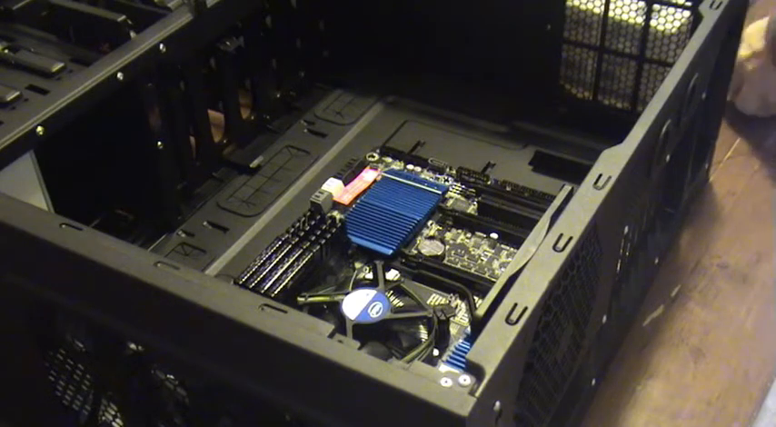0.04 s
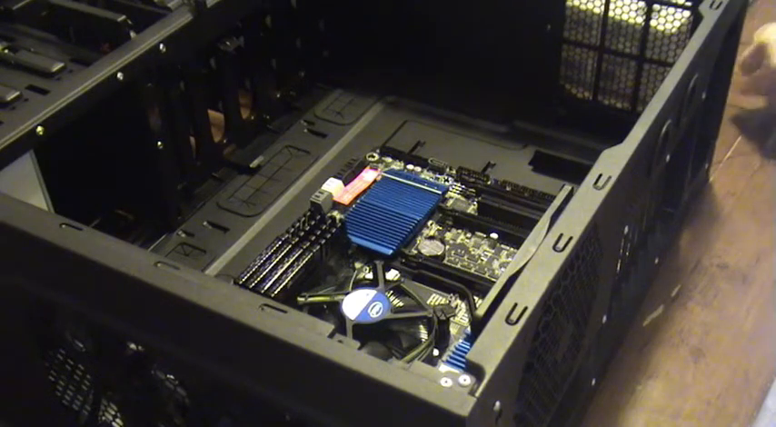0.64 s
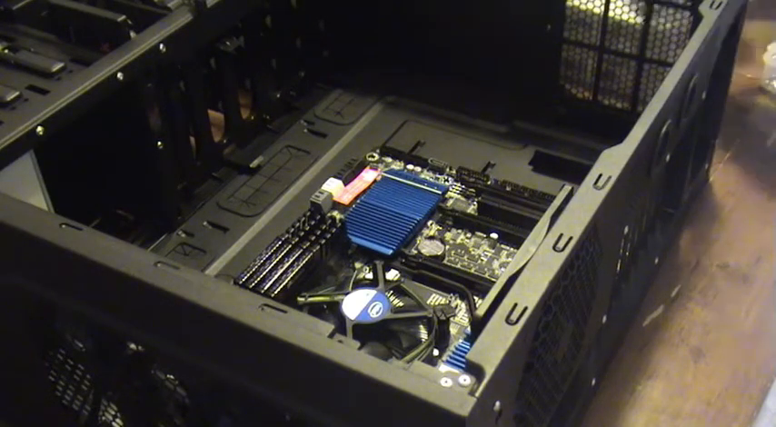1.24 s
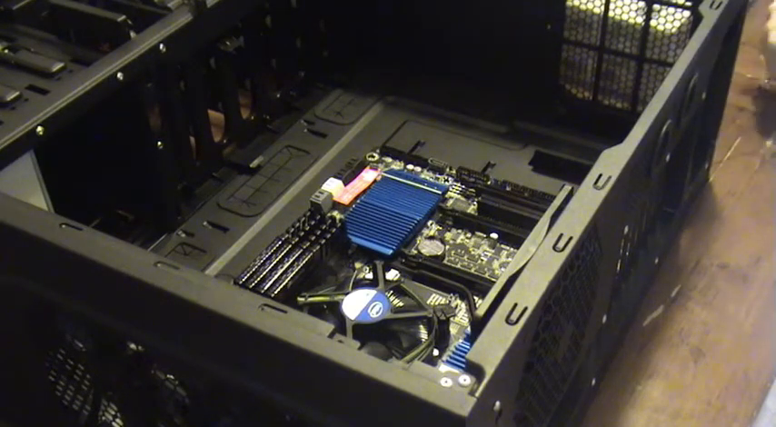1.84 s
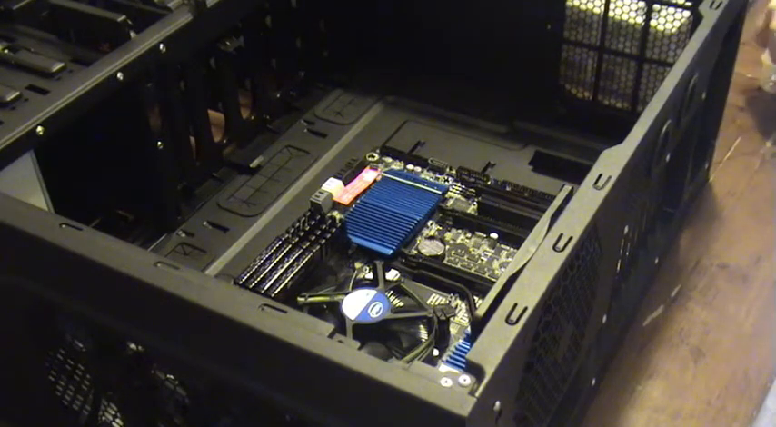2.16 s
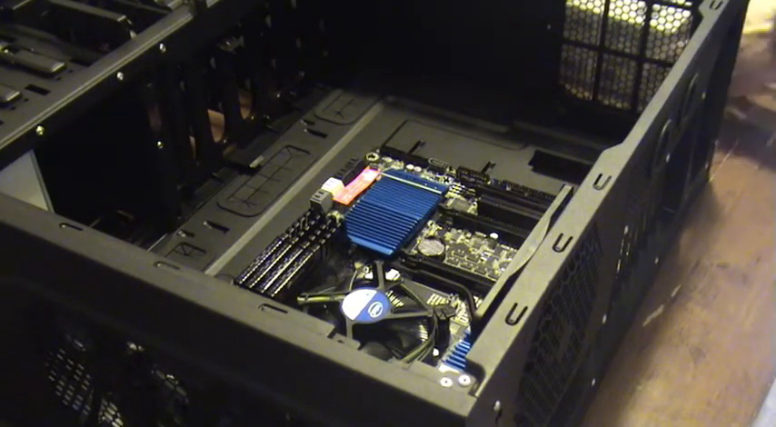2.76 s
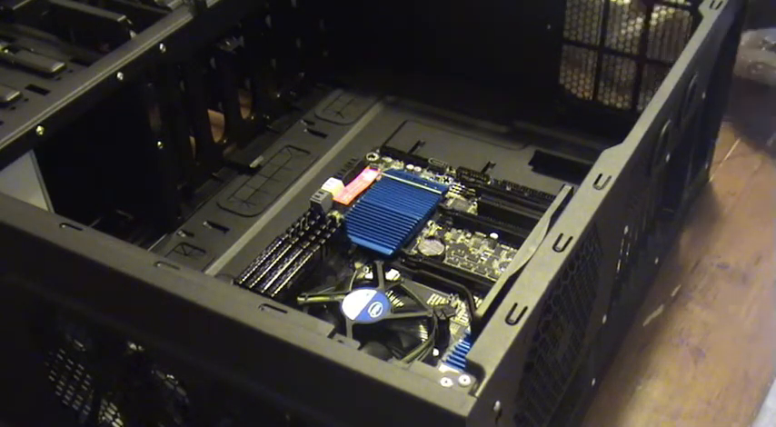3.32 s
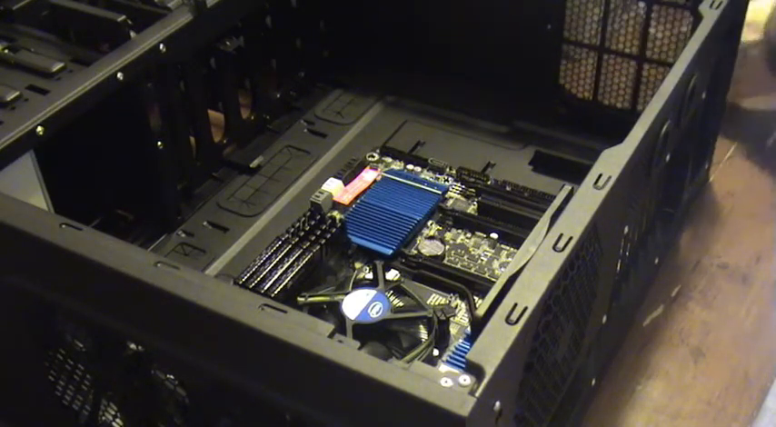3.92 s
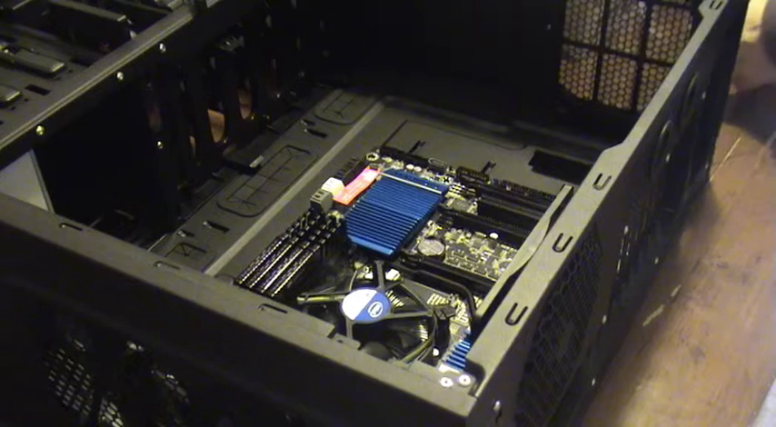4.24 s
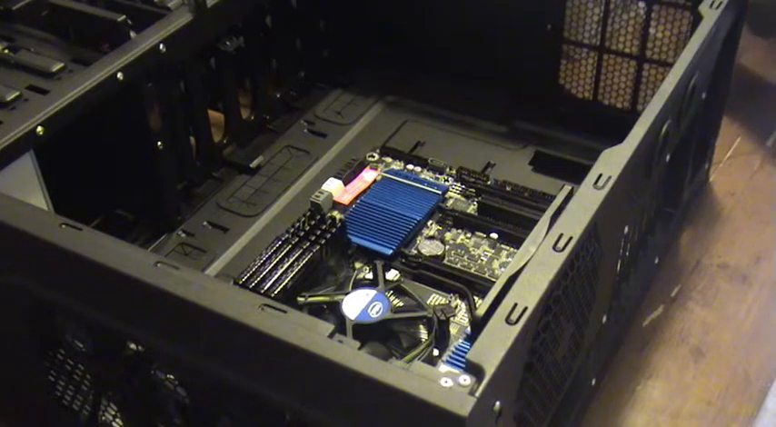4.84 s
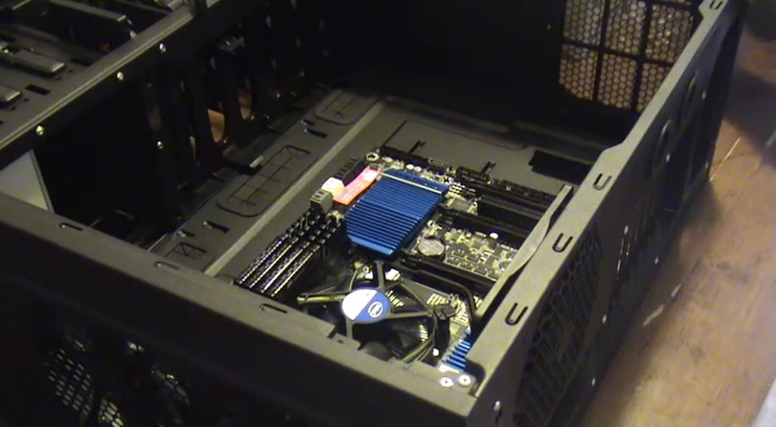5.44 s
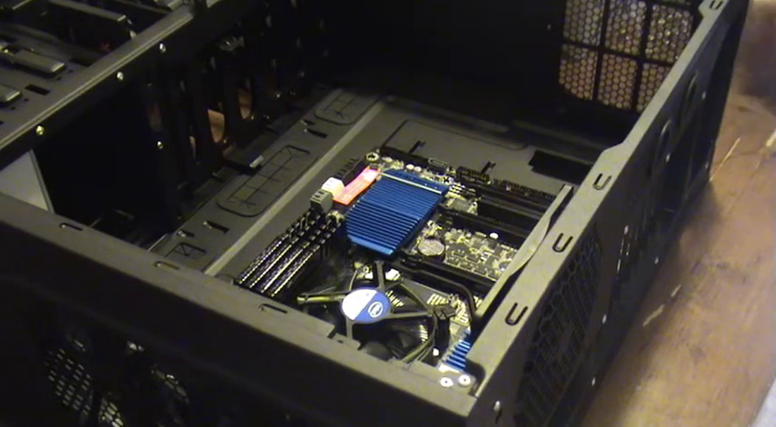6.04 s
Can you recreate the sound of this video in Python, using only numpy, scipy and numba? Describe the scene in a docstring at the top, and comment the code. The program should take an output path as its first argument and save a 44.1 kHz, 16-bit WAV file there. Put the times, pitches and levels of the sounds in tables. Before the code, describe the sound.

A hand rummages through small screws in a hollow box on a wooden bench, over the faint hush of a bare room. From the start, short pushes rattle the screws and the box, with sharp single clinks. The box is knocked or set down at about 0.3, 1 and 1.4 seconds, and another burst of bright clinks comes around 2 seconds, with dull bumps under the sharpest. After a brief lull, a sleeve rustles softly near 3 seconds, along with light clinks and small knocks. The longest rummage runs from about 3.7 to 5.5 seconds, a dense metallic rattle with a hollow ring from the box and many sharp clicks. One more clink follows at 5.5 seconds and a last light knock near 6 seconds. The room rings briefly after each burst.

```python
"""A hand rummages through small screws in a box on a wooden bench, over the faint hush of a bare room.
From the start, each push rattles the screws, the hollow box and the bench top, and single screws clink.
The box is knocked and set down in the first two seconds, and dull bumps sit under some sharp clinks.
Near three seconds a sleeve rustles; then comes the longest rummage, and a last knock near six seconds.
The room rings on after each burst, and a limiter holds down the sharpest peaks."""
import sys
import numpy as np
from scipy import signal
from scipy.fft import rfft, irfft
from scipy.io import wavfile
from scipy.ndimage import uniform_filter1d, minimum_filter1d
from numba import njit

SR = 44100
rng = np.random.default_rng(int(sys.argv[2]) if len(sys.argv) > 2 else 0)


def put_to_file(sound):
    """Save the sound as 16-bit audio at rate SR, in the file named by the first command-line argument."""
    columns = np.atleast_2d(sound).T  # one column per channel
    safe = np.clip(columns, -1, 1)
    whole_steps = np.round(safe * 32767)
    wavfile.write(sys.argv[1], SR, whole_steps.astype(np.int16))


N = 268128
TIME = np.arange(N) / SR

# Levels in the tables are relative: the functions add their own gains.
# Pushes of the hand. Each row: time of full speed, then attack, hold and release, all in seconds; levels
# of screws, box, bench and thud in dB; hollow share of the box sound (0 to 1); hollow pitch in Hz.
PUSHES = [ (0.002, 0.015, 0.0025, 0.041, -24.5, -35, -33.5, -36.5, 0.04, 1410),
          (0.066, 0.028, 0.099, 0.17, -23, -37.5, -38, -45.5, 0, 1410),
          (0.341, 0.014, 0.052, 0.25, -18, -15, -19, -28, 0, 1240),
          (0.404, 0.013, 0.078, .22, -22, -21.5, -28.5, -38, 0.16, 1220),
          (0.671, .015, 0.0046, 0.044, -26.5, -30, -28.5, -41, 0, 1260),
          (0.886, .02, 0.038, .04, -42, -56, -46.5, -61, 0.03, 1240),
          (0.982, 0.027, 0.0062, 0.16, -20, -23.5, -30.5, -39.5, 0.66, 1330),
          (1.889, 0.014, 0.063, .11, -17, -22, -40, -42.5, 0.93, 1470),
          (2.061, 0.0068, 0.0067, 0.21, -24, -24.5, -52, -49.5, 0.7, 1430),
          (2.888, 0.051, 0.16, .1, -50.5, -61, -54.5, -49.5, 0, 1290),
          (3.056, 0.031, 0.027, 0.21, -38.5, -48, -56, -48.5, 0, 1450),
          (3.195, 0.019, 0.026, 0.072, -34, -42, -46, -53, 0, 1600),
          (3.289, 0.05, 0.017, 0.17, -38, -43.5, -37.5, -37, 0.1, 1600),
          (3.75, 0.064, 0.087, 0.087, -33.5, -34, -50, -46.5, 1, 1480),
          (3.876, 0.044, 0.026, 0.1, -18, -21, -34, -40.5, .75, 1440),
          (3.972, .04, .03, 0.22, -27.5, -31, -42, -41.5, 0.96, 1370),
          (4.149, 0.019, 0.052, 0.26, -19.5, -20, -33.5, -49, 0.6, 1230),
          (4.236, 0.17, .06, 0.17, -23, -23, -31, -33, 1, 1380),
          (4.385, 0.047, 0.056, .18, -46, -24, -55, -50, 0.97, 1480),
          (4.747, 0.013, 0.074, 0.15, -36, -33, -46.5, -54.5, 0.06, 1720),
          (4.889, 0.1, 0.069, 0.052, -17, -22.5, -37, -54, 0.84, 1310),
          (4.982, 0.077, 0.22, 0.44, -20, -14.5, -24.5, -46.5, 0.07, 1350)]
# Single screws snapping together. Each row: start in seconds, level in dB, pitch in Hz, echo share in dB.
CLINKS = [(0.0815, -13.5, 2340, 7.5), (0.2043, -17.5, 2470, -2), (0.2377, -17.5, 3630, 6),
          (0.4943, -15, 2570, 1), (0.617, -16.5, 2170, 10.5), (0.9925, -9, 2550, -11),
          (1.8154, -18, 2480, -15), (1.8836, -11, 3380, -6), (1.987, -18, 2430, -16),
          (2.0331, -7, 3540, -16), (2.0495, -9.5, 2580, -12), (2.0794, -2, 2560, -17),
          (2.948, -24.5, 5560, 6), (3.0687, -22.5, 2340, 1), (3.0802, -23.5, 2790, 1),
          (3.188, -18.5, 3800, 12), (3.2402, -14.5, 2400, 5), (3.2858, -16, 2340, -5),
          (3.715, -20.5, 3250, 8), (3.767, -13.5, 2370, 10.5), (3.779, -20, 2280, 15.5),
          (4.032, -18, 3800, 0), (4.147, -10, 3700, 7), (4.2686, -13, 2250, -16), (4.2963, -6, 3270, -20),
          (4.3788, -5.5, 4030, 1.5), (4.4254, -8.5, 3930, 5), (4.6691, -26, 5360, 9), (4.796, -14, 3620, 3),
          (4.8394, -10.5, 2970, -1), (4.8677, -7, 3880, 4), (5.005, -10, 2550, -2),
          (5.5198, -17, 2307, 2.5)]
# The box bumped or set down. Each row: start in seconds, level in dB, then the shares of screws,
# hollow ring, bench and thud in dB.
KNOCKS = [(0.3296, -7, -7, 7.5, 7, -36), (0.338, -5.5, -8, -4, -5, -35), (0.388, -23, 6, -2, -8, -34),
          (0.9678, -21.5, -6.5, 8, 10.5, -7), (1.0043, -32, -6, -8, -14, -27),
          (1.3722, -23.5, 5.5, -8, 3.5, -1.5), (1.4267, -7.5, 1.5, -5, -11, -2),
          (1.4365, -20, -13, -6, 5, 3), (1.7947, -20.5, 3.5, 9.5, -26, -7), (2.9927, -38.5, -15, 0, 13, -5),
          (3.285, -27, -16, -5, 8, -17), (3.3889, -29, 4, -6, 7, 7.5), (3.4197, -26.5, -12, 0, -24, -11),
          (5.9522, -23.5, -3.5, -3, -1, -20)]
# Soft low bumps. Each row: start in seconds, level in dB.
BUMPS = [(0.992, -30), (2.033, -38), (2.08, -34), (4.201, -48), (4.296, -47), (4.377, -41), (4.425, -42),
         (4.865, -44.5), (5.003, -44)]
# Cloth sliding as the arm reaches out. Each row: time of full speed, then attack, hold and release,
# all in seconds; level in dB.
SLEEVE_SLIDES = [(2.654, 0.015, .02, 0.37, -56.5), (3.148, .015, .005, 0.052, -45),
                 (3.40, 0.73, .11, 0.13, -50), (3.594, .025, .004, 0.013, -45.5)]
# A tiny bright snap in the cloth. Each row: start in seconds, level in dB.
CLOTH_SNAPS = [(3.136, -14)]

# The tone of each sound, from bass to treble. Each row: frequency in Hz, level in dB.
HUSH_TONE = [(25, 7.5), (60, 1), (130, 2.5), (300, 2), (600, 1), (1200, 1), (2400, -6), (4000, -13),
             (8000, -16), (15000, -31)]
SCREW_TONE = [(200, -20), (1000, -26), (1600, -4), (2200, 4), (3600, -5.5), (4700, -4.5), (6000, -8),
              (7500, -8), (9000, -16), (12000, -27), (16000, -44)]
SCRAPE_TONE = [(1000, -11.5), (4000, 4), (6000, 1), (8700, 3), (10500, -9), (12500, -35), (16000, -29)]
BOX_TONE = [(150, -46), (700, -8.5), (1050, 2.5), (1500, 2.5), (2300, 2.5), (3000, -4.5), (5000, -2.5),
            (8500, -17.5), (12000, -38.5), (16000, -47)]
THUD_TONE = [(50, -20.5), (105, -26.5), (135, -3), (210, -1.5), (330, -5), (500, 2), (800, -8), (3000, -56),
             (16000, -78)]
HOLLOW_TONE = [(150, -38), (700, -8), (1100, 6), (4000, 1), (9000, -3), (12000, -19.5), (16000, -22)]
BENCH_TONE = [(60, -33), (105, -24), (135, -15), (300, -4.5), (480, 0), (700, 0.5), (1100, -1.5),
              (1900, -11.5), (3500, -28), (16000, -50)]
BUMP_TONE = [(20, 3), (60, 7.5), (100, 7), (300, -2.5), (1000, -22), (16000, -60)]
CLOTH_TONE = [(100, -21), (500, 16), (1500, 11), (4000, 13.5), (8000, 8), (11000, -2), (15500, -11)]
# Pitches at which each thing rings. Each row: pitch in Hz, width in Hz, boost in dB.
SCREW_RINGS = [(2560, 420, 2.5), (3337, 140, 5.5), (3790, 810, 10.5), (5700, 1130, 6)]
BOX_RINGS = [(1000, 140, 5.3), (1214, 88, 3.1), (1670, 190, 3.1), (2600, 270, 9.9)]
THUD_RINGS = [(178, 39, 4.3), (201, 15, 5.3), (318, 71, 6.5)]
BENCH_RINGS = [(133.5, 49, 11.3), (445, 4.3, 6.7), (549, 52, 3.3), (686, 114, 4.6)]
# Rings of the air inside the box. Each row: resting pitch in Hz, width in Hz, level in dB,
# how closely it follows the pitch glide (0 to 1).
HOLLOW_RINGS = [(1427, 157, 0, 1), (2564, 180, 0, 0.03), (3770, 360, -7.5, 0.33), (5560, 710, -18, 0)]
# How wide the room sounds. Each row: frequency in Hz, level of the sides against the middle in dB.
STEREO_WIDTH = [(60, 3.5), (110, -2.5), (200, -12.5), (380, -11), (700, -11), (1290, -10), (2380, -11),
                (4400, -10), (8120, 0), (15000, -13)]
# How long the room rings on. Each row: frequency in Hz, seconds to fade by 60 dB.
ROOM_FADES = [(120, 0.78), (400, 0.52), (1500, 0.61), (3000, 0.51), (6000, 0.48), (10000, 0.38),
              (16000, 0.95)]


def from_db(db):
    """Turn decibels into a number to multiply by."""
    return 10 ** (np.asarray(db) / 20)


def at_hz(points, hz):
    """Read between the rows of a table, giving every octave equal space."""
    points = np.array(points)
    return np.interp(np.log(np.maximum(hz, 1)), np.log(points[:, 0]), points[:, 1])


def resonate(x, tone, rings=(), size=16384):
    """Give a sound the tone and ringing of an object; white noise keeps its power."""
    hz = np.arange(size // 2 + 1) * SR / size
    peaks_db = sum(boost / (1 + (2 * (hz - pitch) / width) ** 2) for pitch, width, boost in rings)
    cepstrum = irfft(np.log(from_db(at_hz(tone, hz) + peaks_db)))
    cepstrum[1:size // 2] *= 2   # minimum phase: nothing rings before it is struck
    cepstrum[size // 2 + 1:] = 0
    response = irfft(np.exp(rfft(cepstrum)))
    response /= np.linalg.norm(response)
    return signal.oaconvolve(x, np.array(response, ndmin=x.ndim), axes=-1)[..., :N]


def wide_noise(size, wider_db=1.5):
    """White stereo noise arriving from all round."""
    width = from_db(at_hz(STEREO_WIDTH, np.arange(size // 2 + 1) * SR / size) + wider_db)
    mid, side = rfft(rng.standard_normal((2, size)))
    return irfft((mid + width * side * [[1], [-1]]) / np.sqrt(1 + width ** 2), size)


def room_hush(level_db=-52):
    """The faint, steady noise of a still room."""
    return from_db(level_db) * resonate(wide_noise(N), HUSH_TONE)


def movement(s, attack_s, hold_s, release_s):
    """Loudness of one slide: it swells to full speed at time s, slows gently, then stops ever faster."""
    attack_db, sag_db_per_s, release_db = 21.5, 5.5, 23
    early = np.maximum(s - TIME, 0) / attack_s
    late = np.maximum(TIME - s - hold_s, 0) / release_s
    loss_db = attack_db * early + sag_db_per_s * np.maximum(TIME - s, 0) + release_db * late ** 1.7
    return from_db(-np.minimum(loss_db, 150))


def push_levels():
    """Loudness over time of screws, box wall, hollow, bench and thud; overlapping pushes add in power."""
    power = np.zeros((5, N))
    for *timing, screws_db, box_db, bench_db, thud_db, hollow, _ in PUSHES:
        levels = from_db([screws_db, box_db, box_db, bench_db, thud_db])
        shares = levels ** 2 * [1, 1 - hollow, hollow, 1, 1]
        power += np.outer(shares, movement(*timing) ** 2)
    return np.sqrt(power)


def contact(fade_s):
    """One touch: a quickly dying chatter, about 60 dB or more down after fade_s."""
    t = np.arange(SR // 8) / SR
    fade = from_db(-60 * t / fade_s)
    spectrum = rfft(rng.standard_normal(len(t)) * fade)
    even_noise = irfft(spectrum / np.abs(spectrum), len(t))   # equally strong at every pitch
    chatter = even_noise * np.sqrt(fade)
    return chatter / np.linalg.norm(chatter)


def tumbling(hits_per_s, spread_db, fade_s, parts=12):
    """Random collisions, many small and few large, among parts that each ring their own way."""
    sizes = from_db(spread_db * np.minimum(rng.exponential(1, N), 4)) * rng.choice([-1, 1], N)
    clicks = sizes * (rng.random(N) < hits_per_s / SR)
    part_hit = rng.integers(0, parts, N)
    rattle = sum(signal.oaconvolve(clicks * (part_hit == k), contact(fade_s))[:N] for k in range(parts))
    power = np.abs(uniform_filter1d(rattle ** 2, SR // 30))
    return rattle / np.sqrt(power + 1e-7)   # keep the loudness steady


def rummaging(screw_db=-2, scrape_db=-16.5, wall_db=-2, bench_db=1):
    """The harder the hand drives the heap of screws against the box, the more collisions a second."""
    screws, wall, hollow, bench, thud = push_levels()
    hits_per_s = 500 + 20000 * np.hypot(wall, hollow)
    heap = tumbling(hits_per_s, spread_db=4, fade_s=0.0061)
    box_floor = tumbling(hits_per_s, spread_db=4, fade_s=0.0092)
    jingle = resonate(heap * screws * from_db(screw_db), SCREW_TONE, SCREW_RINGS)
    scrape = resonate(box_floor * screws * from_db(scrape_db), SCRAPE_TONE)
    wall_rattle = resonate(box_floor * wall * from_db(wall_db), BOX_TONE, BOX_RINGS)
    thudding = resonate(box_floor * thud, THUD_TONE, THUD_RINGS)
    hollow_ring = hollow_box(box_floor * hollow)
    bench_rattle = resonate(heap * bench * from_db(bench_db), BENCH_TONE, BENCH_RINGS)
    # each thing sits in its own spot, so each gets its own echo
    things = [jingle + scrape, wall_rattle + thudding, hollow_ring, bench_rattle]
    return sum(in_room(thing, direct_db=-5, echo_db=-2) for thing in things)


def hollow_pitch(rise_hz_per_s=430, rise_s=0.36):
    """Each push gives the air in the box a new lowest pitch, which climbs as the heap settles."""
    push_s, *_, start_hz = np.transpose(PUSHES)
    latest = np.maximum(np.searchsorted(push_s, TIME) - 1, 0)
    hz = start_hz[latest] + rise_hz_per_s * np.clip(TIME - push_s[latest], 0, rise_s)
    return uniform_filter1d(hz, size=1500)


@njit
def gliding_ring(x, radians, decay):
    """One ring with a moving pitch: every sample it turns by an angle and shrinks a little."""
    out, state = np.zeros(len(x)), 0j
    for i in range(len(x)):
        state = state * decay * np.exp(1j * radians[i]) + (1 - decay) * x[i]
        out[i] = state.real
    return out


def hollow_box(x, level_db=14, rest_hz=1430):
    """The air in the box rings at a few pitches; some glide as the heap moves."""
    glide = hollow_pitch() / rest_hz
    rings = 0
    for hz, width, db, follow in HOLLOW_RINGS:
        radians = 2 * np.pi * hz * glide ** follow / SR
        rings += from_db(db + level_db) * gliding_ring(x, radians, np.exp(-np.pi * width / SR))
    return resonate(rings, HOLLOW_TONE)


def room_echo(x, build_s=0.00076):
    """Dense reflections build up quickly, then each band of pitches fades at its own pace."""
    t, hz = TIME[:SR], np.arange(SR // 2 + 1)
    noise = rfft(wide_noise(SR))
    centres = np.array(ROOM_FADES)[:, 0]
    tail = 0
    for share, (_, fade_s) in zip(np.eye(len(centres)), ROOM_FADES):
        band = irfft(noise * at_hz(np.c_[centres, share], hz), SR)
        tail += band * from_db(-60 * t / fade_s)
    tail *= 1 - np.exp(-t / build_s)
    return signal.fftconvolve(x[None], tail / np.linalg.norm(tail[0]), axes=1)[:, :N]


def in_room(sound, direct_db, echo_db):
    """A sound arrives both directly and off the walls."""
    return from_db(direct_db) * sound + from_db(echo_db) * room_echo(sound)


def hits(times, levels_db, fade_s):
    """A fresh contact at each time."""
    out = np.zeros(N + SR)
    for s, db in zip(times, levels_db):
        hit, start = contact(fade_s), int(s * SR)
        out[start:start + len(hit)] += from_db(db) * hit
    return out[:N]


def clinks(level_db=7, ring_db=8, box_db=-2.5, echo_db=-3, fade_s=0.01, width_hz=1800):
    """One screw slips, snaps onto another and rings briefly about its own pitch; the box answers."""
    paths = np.zeros((2, N + SR))   # straight to the listener, out into the room
    decay = np.exp(-np.pi * width_hz / SR)
    for s, db, hz, echo_share_db in CLINKS:
        snap, start = contact(fade_s), int(s * SR)
        feedback = [1, -2 * decay * np.cos(2 * np.pi * hz / SR), decay ** 2]
        ring = signal.lfilter([1 - decay, 0, decay - 1], feedback, snap)
        clink = (snap + from_db(ring_db) * ring) * from_db(db + level_db)
        paths[:, start:start + len(clink)] += clink * from_db([[0], [echo_share_db + echo_db]])
    direct, into_room = resonate(paths[:, :N], SCREW_TONE, SCREW_RINGS)
    times, levels_db, _, _ = np.transpose(CLINKS)
    box = hollow_box(hits(times, levels_db + level_db + box_db, fade_s))
    return direct + box + room_echo(into_room + box)


def knocks(screw_db=13, box_db=14, hollow_db=9, bench_db=10, thud_db=14):
    """The box meets the bench: the screws jump, its walls and air ring, and the bench top thuds."""
    s, db, screws, hollow, bench, thud = np.transpose(KNOCKS)
    sound = (resonate(hits(s, db + screws + screw_db, fade_s=0.039), SCREW_TONE, SCREW_RINGS)
             + resonate(hits(s, db + box_db, fade_s=0.032), BOX_TONE, BOX_RINGS)
             + hollow_box(hits(s, db + hollow + hollow_db, fade_s=0.017))
             + resonate(hits(s, db + bench + bench_db, fade_s=0.031), BENCH_TONE, BENCH_RINGS)
             + resonate(hits(s, db + thud + thud_db, fade_s=0.017), THUD_TONE, THUD_RINGS))
    return in_room(sound, direct_db=0.5, echo_db=5)


def bumps(level_db=27):
    """Short, dull bumps with no echo, mostly under the sharpest clinks."""
    s, db = np.transpose(BUMPS)
    return resonate(hits(s, db + level_db, fade_s=0.0074), BUMP_TONE)


def sleeve(snap_db=9, echo_db=3):
    """Cloth fibres catch and slip in a fine hiss, with one brighter snap."""
    loudness = sum(from_db(db) * movement(*timing) for *timing, db in SLEEVE_SLIDES)
    fibres = loudness * tumbling(hits_per_s=4300, spread_db=8, fade_s=0.0034, parts=3)
    s, db = np.transpose(CLOTH_SNAPS)
    snap = np.diff(hits(s, db + snap_db, fade_s=0.012), prepend=0)   # too small to give off bass
    echo = room_echo(resonate(fibres + snap / 2, CLOTH_TONE))
    return resonate(fibres + snap, CLOTH_TONE) + from_db(echo_db) * echo


def scene():
    """Add up all the sounds, with the left side a touch louder."""
    mix = room_hush() + rummaging() + clinks() + knocks() + bumps() + sleeve()
    return mix * from_db([[0.25], [-0.25]])


def record(dry, ceiling=0.57, window_samples=45, cutoff_hz=15900):
    """A fast limiter turns down the highest peaks, then the very top of the treble is cut."""
    allowed = ceiling / np.maximum(np.abs(dry).max(axis=0), ceiling)
    gain = uniform_filter1d(minimum_filter1d(allowed, window_samples), window_samples)
    treble_cut = signal.cheby1(12, 0.3, cutoff_hz, fs=SR, output="sos")
    return signal.sosfilt(treble_cut, dry * gain)


dry = scene()
out = record(dry)
put_to_file(out)
```